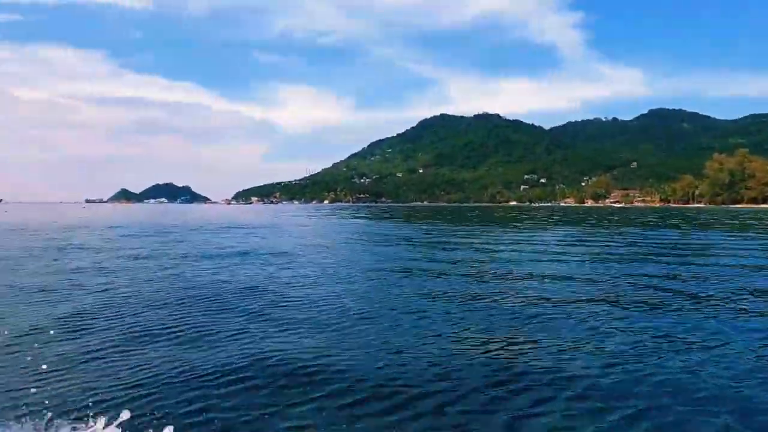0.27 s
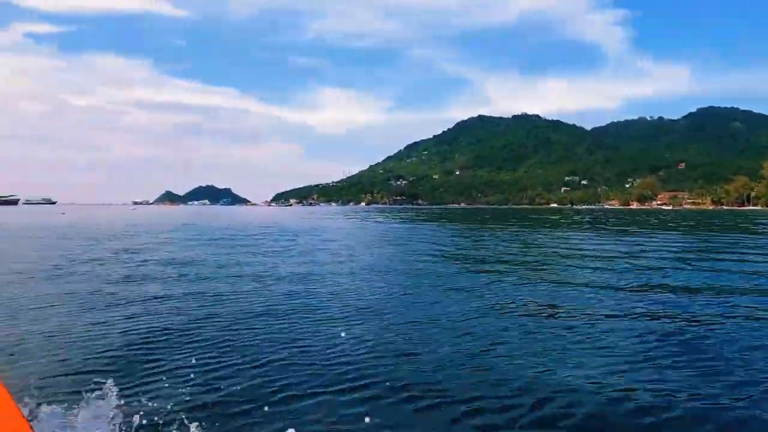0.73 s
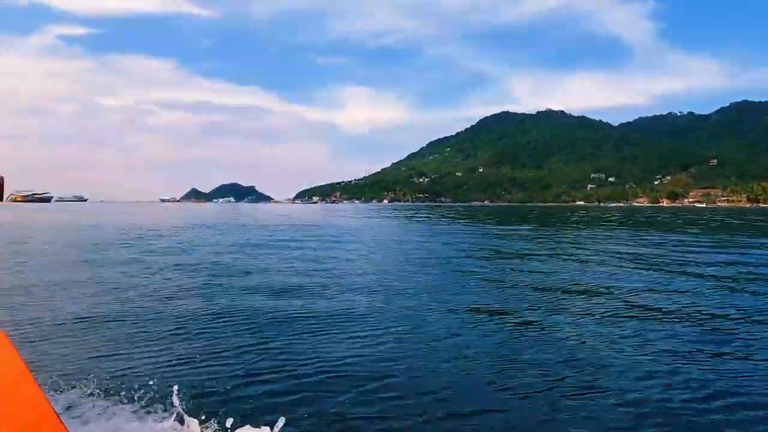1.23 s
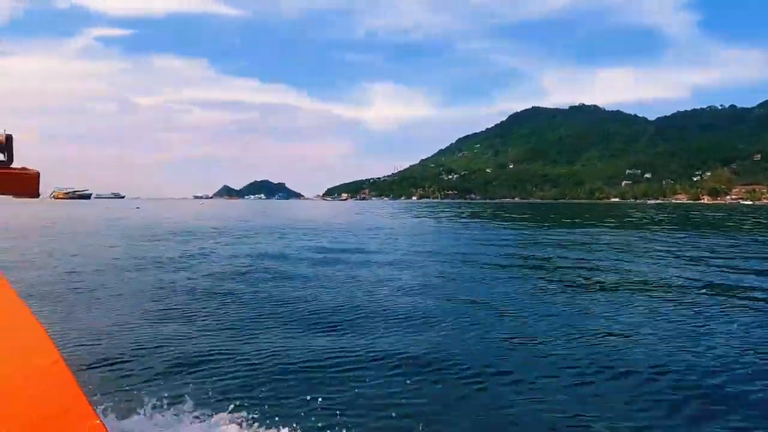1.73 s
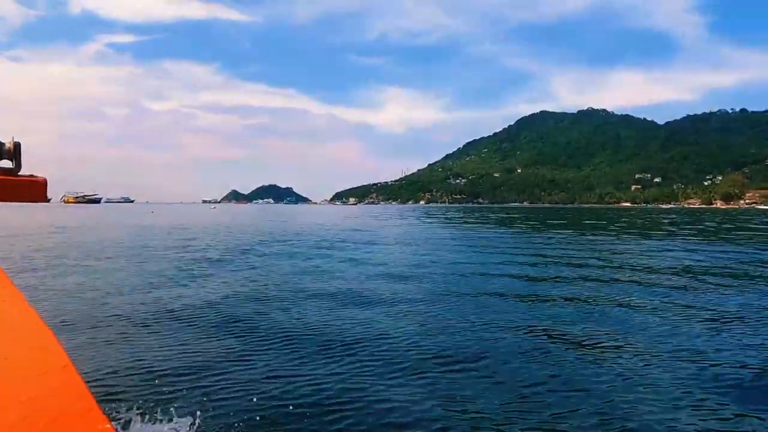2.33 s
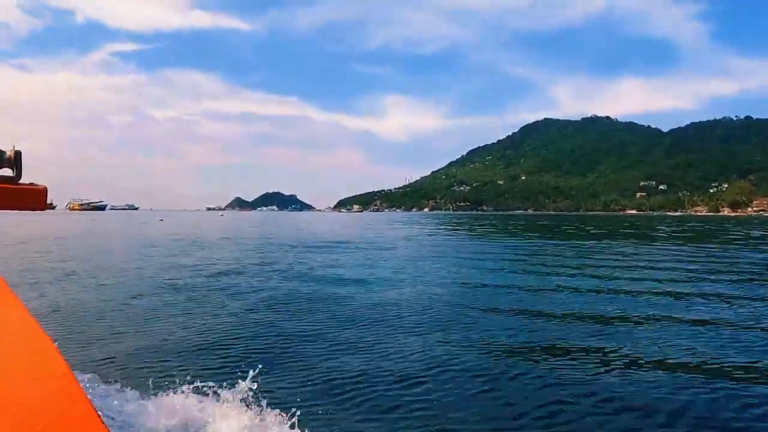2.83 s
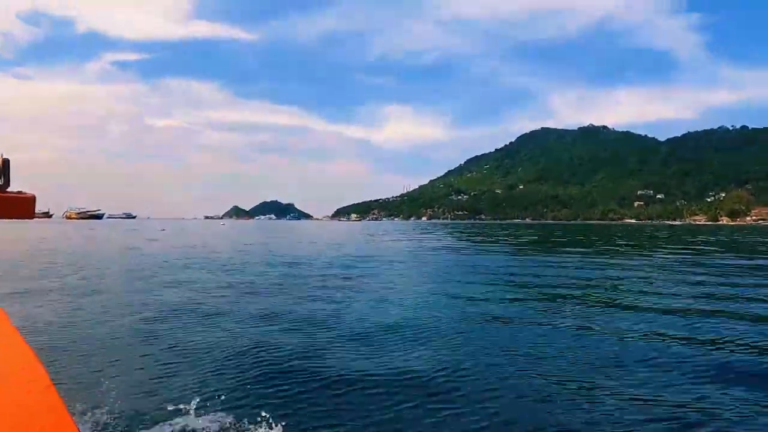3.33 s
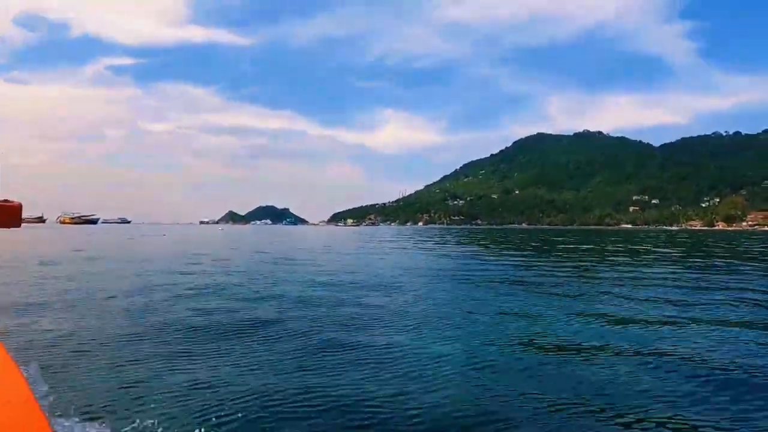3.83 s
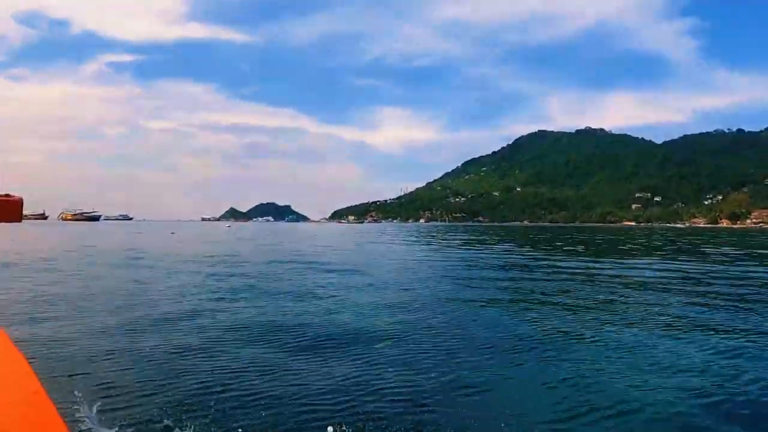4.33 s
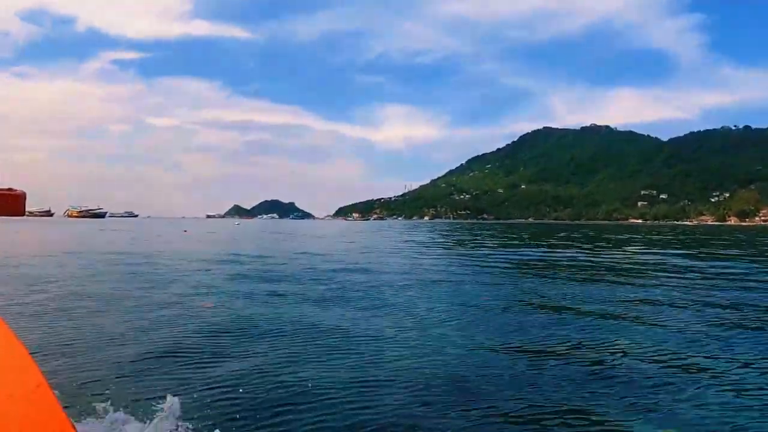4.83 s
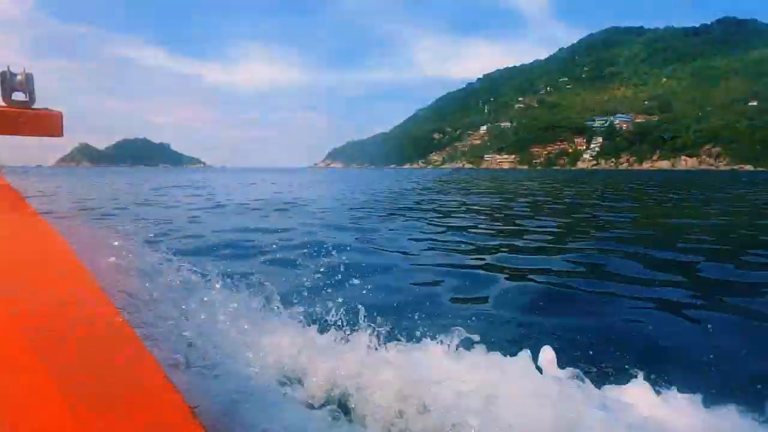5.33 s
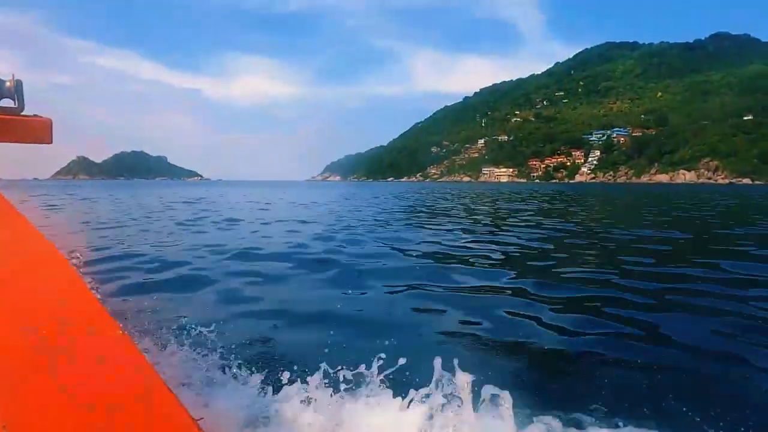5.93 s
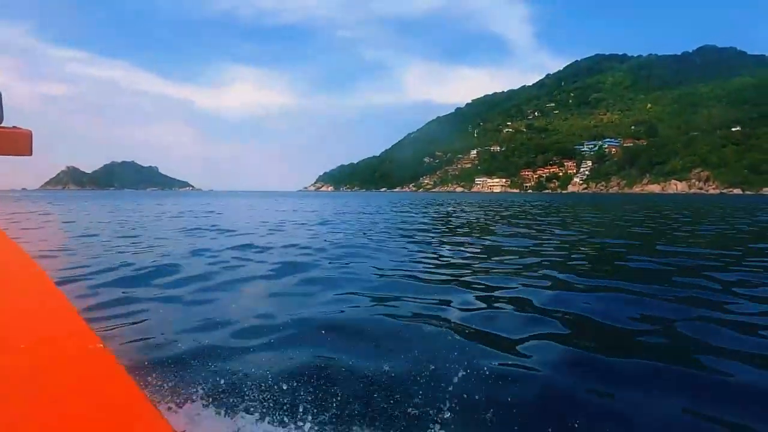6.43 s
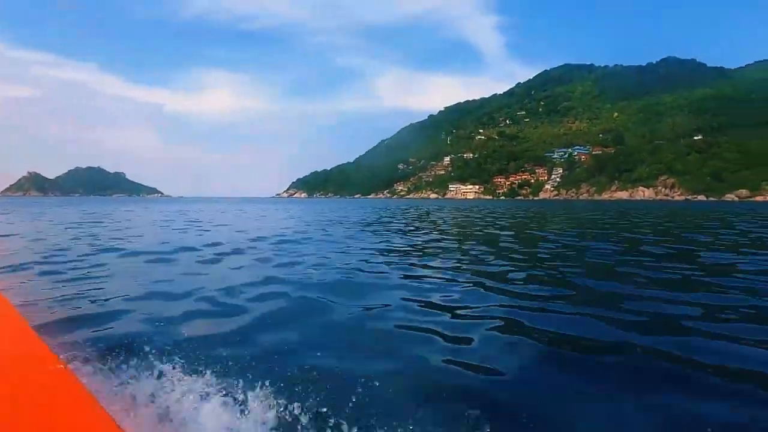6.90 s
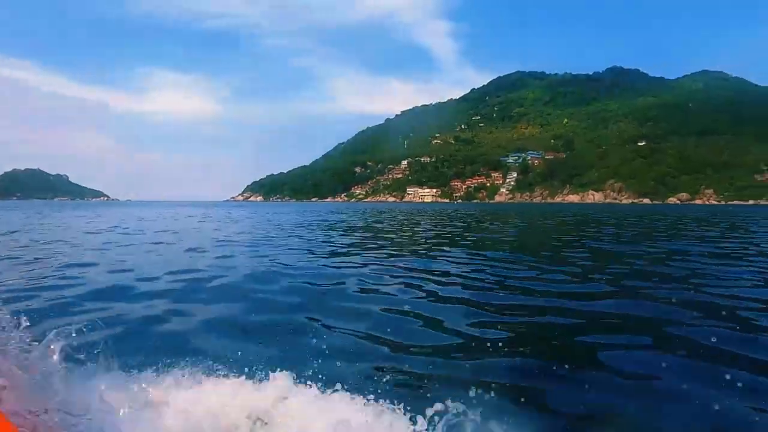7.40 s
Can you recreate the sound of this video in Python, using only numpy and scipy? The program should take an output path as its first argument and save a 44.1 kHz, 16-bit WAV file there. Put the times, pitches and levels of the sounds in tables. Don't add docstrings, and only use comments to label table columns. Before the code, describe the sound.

An open wooden boat runs across calm sea, heard in stereo from on board. From 0 to 5.2 seconds a four-cylinder engine is close and loud: a low firing note around 70 hertz, buzzing harmonics, belt and shaft hum, and a rough midrange roar over hull rumble. Its pitch sags slightly until about 2 seconds, recovers gently, then rises near 4.5 to 5. Thin spray hiss lies underneath, with slight swells at 1.8 and around 4; a dull slap knocks at 4.5. A short overlap begins at 4.9, and at 5.17 the loud engine cuts with a click. The rest is much quieter and duller: a steady, faster engine hum around 80 hertz, deep rumble and buffeting wind, gustier near 6.3 and 7.5. Bow waves hiss at 5.7, 6.25, 7.1 and 7.5, with small droplet ticks, faint slaps near 6.4 and another at 7.6.

```python
import sys
import numpy as np
from scipy import signal
from scipy.fft import rfft, irfft, next_fast_len
from scipy.io import wavfile

SR = 44100
rng = np.random.default_rng(int(sys.argv[2]) if len(sys.argv) > 2 else 0)


def master_out(mix):
    frames = np.transpose(np.atleast_2d(mix))
    ceiling = np.clip(frames, -1, 1)
    pcm = np.round(ceiling * 32767).astype(np.int16)
    wavfile.write(sys.argv[1], SR, pcm)


def rack_gain(trim_db):
    fader = np.asarray(trim_db, float)
    return 10 ** (fader / 20)


N = 337806

# [t/s, firings per second]
NEAR_SPEED = [(0.0, 71.26), (0.6, 68.79), (1.2, 66.97), (1.5, 66.55), (2.1, 66.44), (2.4, 67.05),
              (3.3, 68.04), (3.9, 67.66), (4.2, 68.4), (4.8, 71.95), (5.17, 72.88)]
FORE_SPEED = [(4.9, 78.84), (5.2, 80.58), (5.5, 79.58), (5.8, 79.34), (6.1, 80.14), (6.4, 79.69),
              (7.0, 79.68), (7.66, 80.57)]
NEAR_SPAN, FORE_SPAN = (0, 5.16635), (4.9, 7.66)
NEAR_TURN, FORE_TURN = .375, .880
FORE_FADE = (4.925, 4.965)

# [t/s, level/dB]
NEAR_EXHAUST = [(0.1, -13.5), (0.55, -12), (1.25, -17.5), (2.0, -15), (2.3, -14), (2.95, -16),
                (3.55, -13.5), (5.15, -13.9)]
FORE_EXHAUST = [(5.26, -18), (5.66, -22), (6.08, -17.5), (6.28, -16.5), (6.46, -19.5), (6.9, -18.5),
                (7.6, -17)]
# [level/dB, dB per dB of firing note, dB per firing a second, dB per dB of wave]
NEAR_TONES = [
    (-32.5, -2.5, 0.85, 2.5),
    (-27, -2, -0.28, 1),
    (-32.5, 2.5, 0.37, 0.5),
    (-38, -1, 1.36, 3),
]
FORE_TONES = [
    (-33.5, -.1, .1, 2),
    (-39, .1, -.8, 0.4),
    (-42.5, .9, -.6, 0.1),
    (-46, .1, -.1, 0.08),
]
BELT, SHAFT = .5933, .1837

# [quarters of the firing rate, level/dB]
NEAR_CRANK = [(2, -49), (3, -43), (5, -31.5), (6, -34.5), (9, -36), (10, -38.5), (18, -48.5), (20, -45),
              (24, -46.5), (28, -49), (35, -46.5), (36, -38), (37, -48), (38, -54.5), (40, -42), (58, -39),
              (62, -46.5), (66, -37), (68, -50.5), (70, -36.5), (72, -43), (81, -51)]
FORE_CRANK = [(6, -41), (7, -43), (8, -39.5), (12, -50.5), (14, -54.5), (24, -60), (30, -56), (32, -61),
              (38, -57), (46, -63.5), (54, -57), (68, -58), (72, -48.5), (84, -54.5), (94, -57)]
# [multiple of the pulley rate, level/dB]
NEAR_BELT = [(6, -34), (8, -35), (9, -39.5), (11, -43.5), (19, -47.5), (20, -46), (26, -33)]
FORE_BELT = [(9, -56.5), (19, -50.5)]
# [quarters of the firing rate, shaft turns added, level/dB]
NEAR_SHAFT = [(0, 6, -39.5), (2, 0, -47.5), (4, -2.5, -27), (4, 1, -27.5), (6, -4, -36), (8, -2, -35),
              (8, 2.5, -34.5)]
FORE_SHAFT = [(8, 1, -39.5), (3.8, 2.5, -57.5), (4.4, 1, -54)]
# [f/Hz, width/Hz, lift/dB]
HULL = [(323, 12, 2.5), (615, 14, 6), (765, 30, 2.5), (1037, 13, 4.5), (1176, 70, 7)]

# [f/Hz, level/dB per Hz]
NEAR_ROAR = [(200, -21.5), (340, -3), (466, -8), (514, -4.5), (571, -6.5), (614, -5.5), (727, -12),
             (789, -3), (855, -9), (942, 0.5), (1150, -2.5), (1370, -11), (1450, -13.5), (1980, -16.5),
             (2350, -30), (3060, -81), (5170, -120)]
FORE_ROAR = [(200, -47), (340, -18), (356, -12), (398, -14), (420, -15.5), (616, -11), (777, -21.5),
             (844, -15), (870, -9), (917, -13), (1210, -16), (1400, -8), (1590, -18), (1670, -17.5),
             (2050, -22), (2660, -58), (4510, -120)]
# [f/Hz, width/Hz, lift/dB]
NEAR_CASING = [(650, 27, 2), (1070, 36, 1.5), (1350, 18, 7), (1747, 20, 5)]
FORE_CASING = [(860, 45, -8), (930, 40, 4), (1530, 60, -2.5), (1704, 44, 3), (1860, 33, 8)]
NEAR_ROAR_DB, FORE_ROAR_DB = -24.5, -39.5
LABOUR_DB = -0.19
ROAR_FOLLOWS = .35

# [f/Hz, level/dB per Hz]
NEAR_RUMBLE = [(22, -30), (35, -8.5), (50, -0.5), (90, -5), (110, -4.5), (150, -2.5), (190, -0.5),
               (260, -4.5), (340, -7.5), (420, -30.5)]
FORE_RUMBLE = [(25, -23), (40, -0.5), (70, 3), (95, -2), (125, -16.5), (145, -14), (215, -9.5), (300, -16),
               (360, -17), (430, -38)]
NEAR_RUMBLE_DB, FORE_RUMBLE_DB = -26.5, -33.5

# [f/Hz, level/dB per Hz]
NEAR_WASH = [(2000, -25.5), (2400, -7), (2650, -6.5), (3050, -3), (3600, -6), (4900, -2), (5450, -8.5),
             (6000, -4.5), (6400, -8.5), (7400, -9),
             (8000, -18), (8600, -21), (9300, -25), (10200, -30), (10550, -37), (10900, -32), (11700, -29),
              (12400, -32), (13000, -48), (13200, -42), (13600, -52), (14000, -46), (15000, -55)]
FORE_WASH = [(1800, -26), (2050, -7), (2250, -6), (2400, -1), (2750, -8.5), (2950, -3), (3550, -10.5),
             (3900, -3), (4200, -1), (4700, -10), (5100, -6.5), (5800, -13.5), (6200, -5), (6750, -16),
             (8000, -25), (9000, -27), (10200, -33), (10700, -42), (11800, -40), (12500, -44),
              (12800, -53), (15000, -58)]
NEAR_WASH_DB, FORE_WASH_DB = -43.5, -46.5
TOP_HZ = 15050
# [t/s, lift of the spray/dB]
NEAR_WAVES = [
    (1.8, 1.7),
    (3.7, 0.8),
    (4.1, .6),
]
FORE_WAVES = [
    (5.7, 3.7),
    (6.25, 1.5),
    (7.06, 2.9),
    (7.5, 2.8),
]
WAVE_S = 0.21
STERN_LAG_S, STERN_WAVE_S = 0.12, .35

# [f/Hz, level/dB per Hz]
WIND = [(6, -22), (12, -8), (18, -1), (30, 0), (40, -2), (55, -12), (90, -30)]
# [t/s, level/dB]
NEAR_GUST = [(0, -46), (5.17, -41)]
FORE_GUST = [(5.26, -32.5), (6.2, -33), (6.35, -28), (6.55, -37), (7.35, -35), (7.56, -26.5)]

# [t/s, peak level/dB, f/Hz]
SLAPS = [
    (4.495, -17, 800),
    (6.380, -33, 540),
    (6.385, -29, 670),
    (6.394, -30, 690),
    (6.399, -33, 560),
    (7.589, -22, 620),
]
# [t/s, peak level/dB, f/Hz]
DROPS = [(5.672, -36, 3400), (5.696, -37, 5000), (5.756, -35, 6000), (5.757, -37, 5000), (5.802, -38, 4800),
         (5.943, -30, 5600), (6.198, -38, 4100), (6.424, -39, 6900), (6.986, -31, 5100), (7.144, -37, 4200),
         (7.279, -44, 8400), (7.567, -37, 6100)]

# [f/Hz, left minus right/dB]
NEAR_BALANCE = [(60, 0.75), (300, 0.5), (600, 3.5), (900, 5), (1400, 4.5), (2200, 0), (2900, 11.5),
                (3600, 6.5), (4200, 1), (5000, -4.5), (6500, -4), (8000, 0), (10000, -2), (12000, 2.5)]
FORE_BALANCE = [(60, 0.45), (360, 1), (560, 2), (1370, 2.5), (2400, 3.5), (3200, 3), (3600, -6),
                (3900, 8.5), (4300, -3.5), (5000, -2.5), (6500, -1.5), (8000, 1)]
# [f/Hz, share 0-1]
NEAR_ALIKE = [(60, 0.93), (1370, 1), (2140, 0.91), (3350, 0.6), (5230, 0.99), (8180, 0.75), (10000, 0.52),
              (12000, 0.53)]
FORE_ALIKE = [(60, 0.98), (360, 0.96), (560, 0.89), (1370, 0.97), (2140, 0.9), (3350, 0.72), (5230, 0.91),
              (7300, 0.91), (9500, 0.66), (12000, .5)]
# [f/Hz, phase/rad]
NEAR_LEAD = [(0, 0), (1980, 0.0), (2240, -0.4), (2670, -2.1), (2930, -1.3), (3360, 0.3), (4480, 0.7),
             (5250, 0.4), (5510, 0.6), (7240, -0.2), (8350, -0.1)]
FORE_LEAD = [(0, 0), (1120, -0.1), (1550, -0.4), (1980, -0.2), (2580, -0.9), (3450, -1.1), (4050, 0.1),
             (4310, 0.3), (4650, -0.2), (5080, 0.2), (6550, 0.0), (8350, 0.1)]

STEP = 40
SPLICE_JUMP, SPLICE_S = -.2, .001


def in_time(rows, t):
    s, values = np.transpose(rows)
    return np.interp(t, s, values)


def at_hz(points, hz):
    f, values = np.transpose(points)
    return np.interp(np.log(hz + 1), np.log(f + 1), values)


def slow_chance(rate, size):
    r = np.exp(-2 * np.pi * STEP * rate / SR)
    white = rng.standard_normal(size // STEP + 2001)
    slow = signal.lfilter([1], [1, -2 * r, r * r], white)[2000:]
    return slow / np.std(slow)


def filled(slow, size):
    return np.interp(np.arange(size) / STEP, np.arange(len(slow)), slow)


def drift(rate, size):
    return filled(slow_chance(rate, size), size)


def peaks_db(modes, hz):
    return sum(db / (1 + (2 * (hz - centre) / width) ** 2) for centre, width, db in modes)


def waves_db(waves, t, half_s):
    return sum(db * np.exp(-((t - s) / half_s) ** 2) for s, db in waves)


def ports(shared, own, seat):
    size = next_fast_len(len(shared))
    hz = np.fft.rfftfreq(size, 1 / SR)
    alike = np.clip(at_hz(seat["alike"], hz), 0, 1)
    half = rack_gain(at_hz(seat["balance"], hz) / 2) * np.exp(.5j * at_hz(seat["lead"], hz))
    both = np.sqrt(alike) * rfft(shared, size) + np.sqrt(1 - alike) * rfft(own, size)
    return hz, both * [half, 1 / half], size


def noise(spectrum, gate, seat):
    white = rng.standard_normal((3, len(gate))) * gate
    hz, both, size = ports(white[0], white[1:], seat)
    inside = (hz > spectrum[0][0]) & (hz < spectrum[-1][0])
    return hz, both * rack_gain(at_hz(spectrum, hz)) * inside, size


def even_level(sound):
    return sound / np.std(sound.mean(axis=0))


def heard(hz, both, size, count):
    return even_level(irfft(both, size)[:, :count])


def exhaust(seat, t, turns, speed):
    firing_db = in_time(seat["exhaust"], t)
    bite_db = waves_db(seat["waves"], t - STERN_LAG_S, STERN_WAVE_S)
    out = rack_gain(firing_db + 0.23 * drift(6.5, len(t))) * np.cos(2 * np.pi * turns)
    for (order, lag), (db, per_db, per_speed, per_wave) in zip(seat["orders"], seat["tones"]):
        db = db + per_db * (firing_db - firing_db.mean())
        db = db + per_speed * (speed - speed.mean()) + per_wave * bite_db
        flutter_db = 1.4 * drift(7, len(t)) + 0.98 * drift(3.0, len(t))
        out += rack_gain(db + flutter_db) * np.cos(2 * np.pi * (order * turns - lag))
    return np.sqrt(2) * out


def tone(order, level_db, turns, speed):
    wander_db = 1.8 * slow_chance(1.3, len(turns))
    tone_hz = order * np.resize(speed[::STEP], len(wander_db))
    lift_db = peaks_db(HULL, tone_hz)
    gain = filled(rack_gain(level_db + 2.5 + lift_db + wander_db), len(turns))
    waver = .011 * order * drift(4, len(turns))
    return gain * np.cos(2 * np.pi * (order * turns + rng.random()) + waver)


def machinery(seat, turns, speed):
    orders = [(quarters / 4, db) for quarters, db in seat["crank"]]
    orders += [(k * BELT, db) for k, db in seat["belt"]]
    orders += [(quarters / 4 + k * SHAFT, db) for quarters, k, db in seat["shaft"]]
    return sum(tone(order, db - 3.0, turns, speed) for order, db in orders)


def roar(seat, turns):
    beat_db = seat["pulse_db"] * np.cos(2 * np.pi * (turns - .1))
    beat_db = beat_db + 0.77 * np.cos(2 * np.pi * turns / 4)
    gate = rack_gain(beat_db + 0.39 * drift(22, len(turns)))
    hz, both, size = noise(seat["roar"], gate, seat)
    return heard(hz, both * rack_gain(peaks_db(seat["casing"], hz)), size, len(turns))


def rumble(seat, count):
    return heard(*noise(seat["rumble"], rack_gain(2.0 * drift(8.6, count)), seat), count)


def wash(seat, count):
    hz, both, size = noise(seat["wash"], rack_gain(seat["fizz_db"] * drift(60, count)), seat)
    edges = np.geomspace(1700, TOP_HZ, 7)
    together = drift(16, count)
    out = 0
    for low, high in zip(edges, edges[1:]):
        band = irfft(both * ((hz >= low) & (hz < high)), size)[:, :count]
        flicker = 1.2 * together + 1.4 * drift(8.8, count)
        out = out + band * rack_gain(seat["patchy_db"] * flicker)
    return even_level(out)


def wind(seat, count):
    return heard(*noise(WIND, rack_gain(2.66 * drift(2.9, count)), seat), count)


def knocks(events, swell_cycles, cycles):
    out, t = np.zeros(N), np.arange(2000) / SR
    for s, db, hz in events:
        at = round(s * SR)
        swell = np.sin(np.pi / 2 * np.minimum(t * hz / swell_cycles, 1)) ** 2
        ring = swell * np.sin(2 * np.pi * hz * t) * rack_gain(db + 9.0 - 60 * t * hz / cycles)
        out[at:at + len(t)] += ring[:N - at]
    return out


def slaps():
    return knocks(SLAPS, swell_cycles=2, cycles=13) * rack_gain([[1.8], [-1.8]])


def droplets():
    return knocks(DROPS, swell_cycles=6, cycles=55) * rack_gain(-3)


def listen(seat):
    first, last = round(seat["span"][0] * SR), min(round(seat["span"][1] * SR), N)
    count = last - first
    t = np.arange(first, last) / SR
    speed = in_time(seat["speed"], t)
    turns = seat["turn"] + np.cumsum(speed) / SR
    spray_db = waves_db(seat["waves"], t, WAVE_S)
    roar_db = seat["roar_db"] + LABOUR_DB * (speed - speed.mean()) + ROAR_FOLLOWS * spray_db
    notes = exhaust(seat, t, turns, speed) + machinery(seat, turns, speed)
    edge = 2000
    hz, both, size = ports(np.pad(notes, edge, "reflect"), np.zeros((2, 1)), seat)
    sound = irfft(both, size)[:, edge:edge + count]
    sound += rack_gain(roar_db) * roar(seat, turns)
    sound += rack_gain(seat["rumble_db"]) * rumble(seat, count)
    sound += rack_gain(seat["wash_db"] + spray_db) * wash(seat, count)
    sound += rack_gain(in_time(seat["gust"], t)) * wind(seat, count)
    return np.pad(sound, ((0, 0), (first, N - last)))


def scene():
    near = dict(span=NEAR_SPAN, speed=NEAR_SPEED, turn=NEAR_TURN, exhaust=NEAR_EXHAUST,
                orders=[(2, .29), (3, .49), (7 * BELT, 0), (13 * BELT, 0)], tones=NEAR_TONES,
                crank=NEAR_CRANK, belt=NEAR_BELT, shaft=NEAR_SHAFT, waves=NEAR_WAVES, gust=NEAR_GUST,
                roar=NEAR_ROAR, roar_db=NEAR_ROAR_DB, casing=NEAR_CASING,
                wash=NEAR_WASH, wash_db=NEAR_WASH_DB,
                rumble=NEAR_RUMBLE, rumble_db=NEAR_RUMBLE_DB, pulse_db=1.0, fizz_db=0.5, patchy_db=0.44,
                balance=NEAR_BALANCE, alike=NEAR_ALIKE, lead=NEAR_LEAD)
    fore = dict(span=FORE_SPAN, speed=FORE_SPEED, turn=FORE_TURN, exhaust=FORE_EXHAUST,
                orders=[(3 * SHAFT, 0), (2.5, 0), (6 * BELT, 0), (7 * BELT, 0)], tones=FORE_TONES,
                crank=FORE_CRANK, belt=FORE_BELT, shaft=FORE_SHAFT, waves=FORE_WAVES, gust=FORE_GUST,
                roar=FORE_ROAR, roar_db=FORE_ROAR_DB, casing=FORE_CASING,
                wash=FORE_WASH, wash_db=FORE_WASH_DB,
                rumble=FORE_RUMBLE, rumble_db=FORE_RUMBLE_DB, pulse_db=1.4, fizz_db=1.1, patchy_db=0.53,
                balance=FORE_BALANCE, alike=FORE_ALIKE, lead=FORE_LEAD)
    behind, cut = listen(near), round(NEAR_SPAN[1] * SR)
    bend = np.exp((np.arange(cut) - cut) / SR / SPLICE_S)
    behind[:, :cut] += (SPLICE_JUMP - behind[:, cut - 1:cut]) * bend
    fade_in = np.interp(np.arange(N) / SR, FORE_FADE, [0, 1])
    return behind + fade_in * listen(fore) + slaps() + droplets()


def top_cut(x):
    return signal.sosfilt(signal.butter(12, 15050, fs=SR, output="sos"), x)


def record(dry):
    return top_cut(dry)


dry = scene()
out = record(dry)
master_out(out)
```